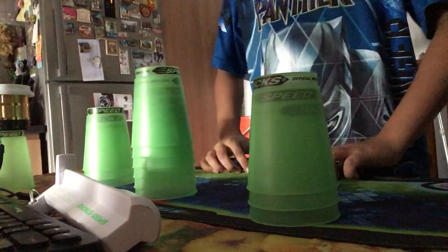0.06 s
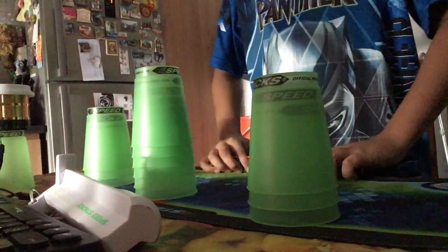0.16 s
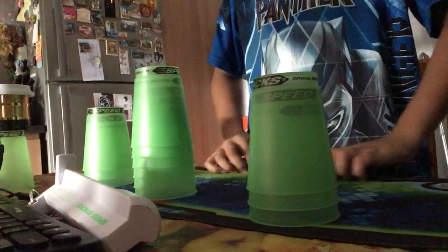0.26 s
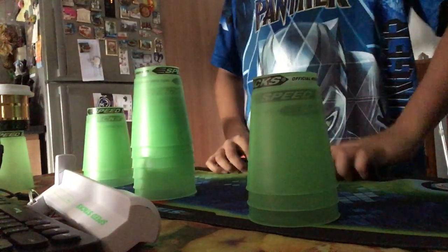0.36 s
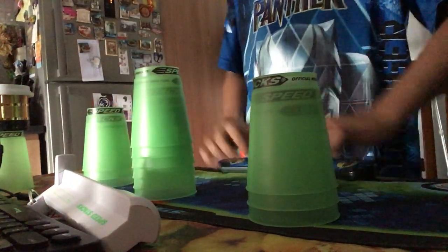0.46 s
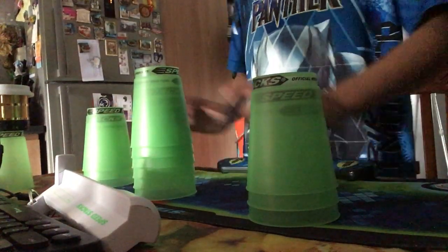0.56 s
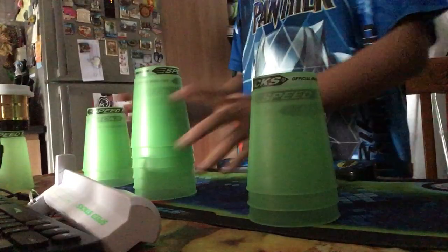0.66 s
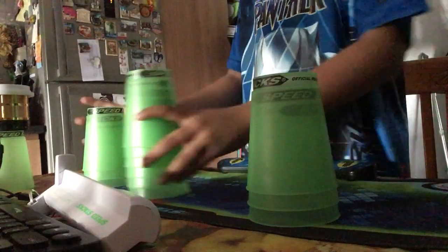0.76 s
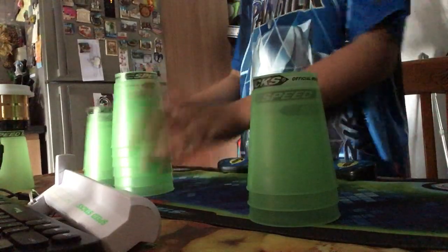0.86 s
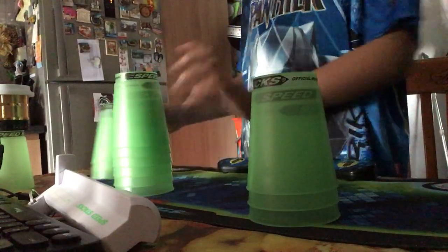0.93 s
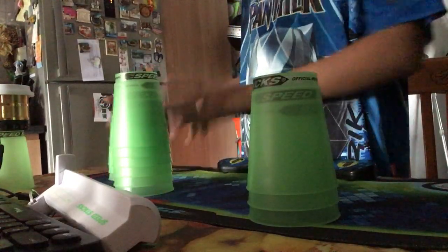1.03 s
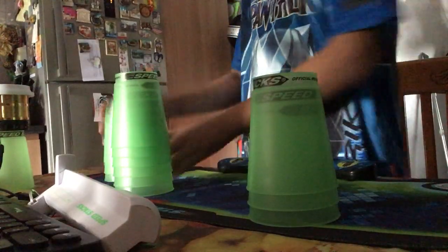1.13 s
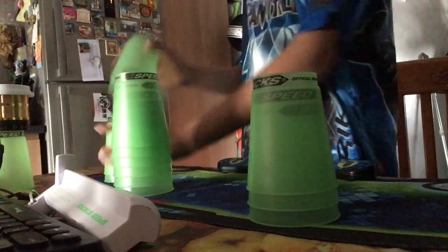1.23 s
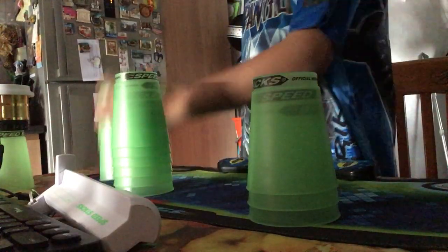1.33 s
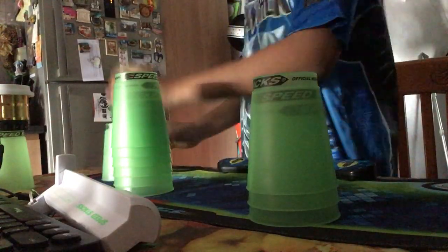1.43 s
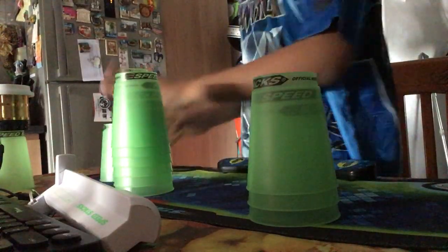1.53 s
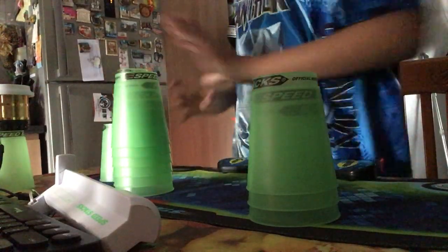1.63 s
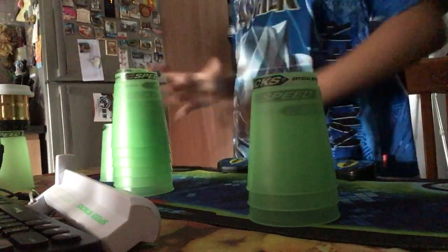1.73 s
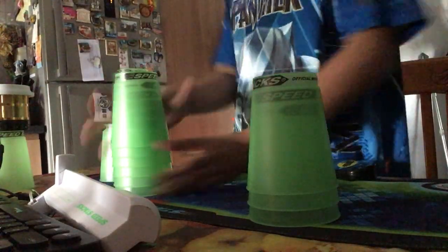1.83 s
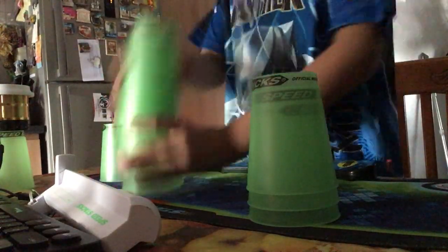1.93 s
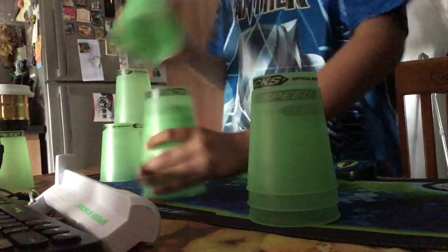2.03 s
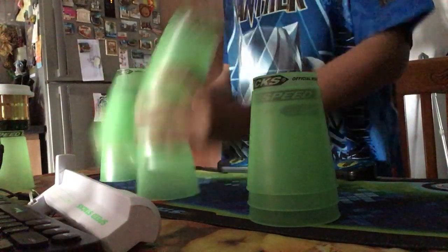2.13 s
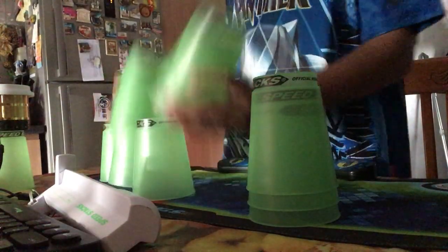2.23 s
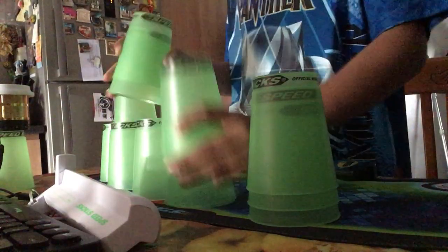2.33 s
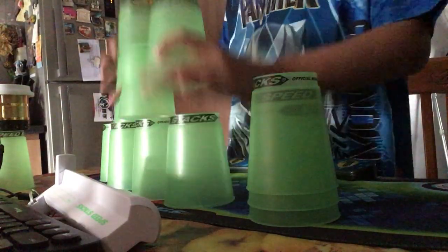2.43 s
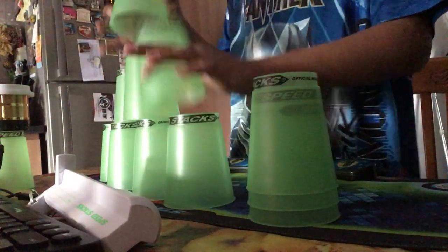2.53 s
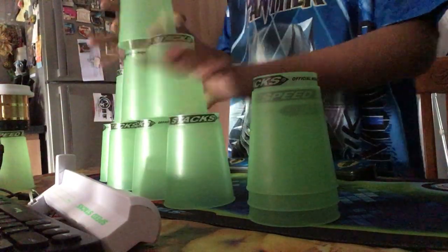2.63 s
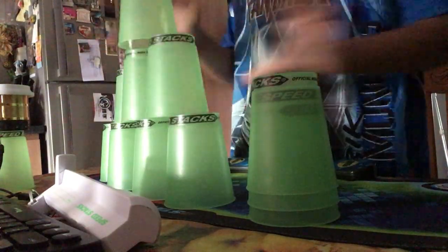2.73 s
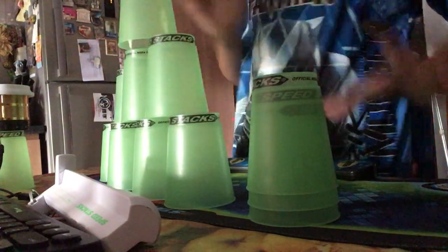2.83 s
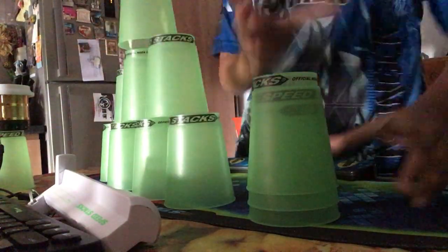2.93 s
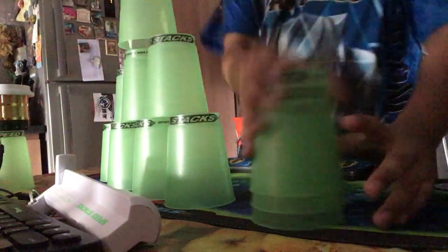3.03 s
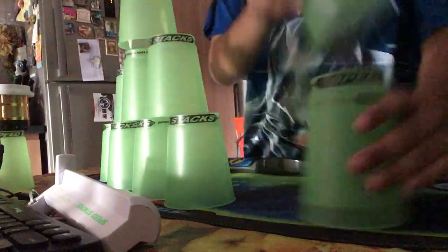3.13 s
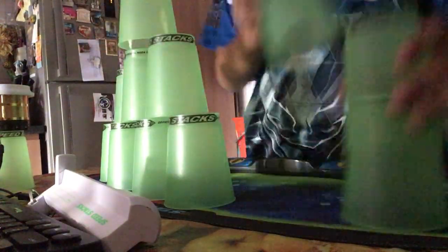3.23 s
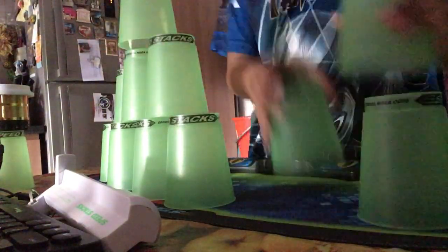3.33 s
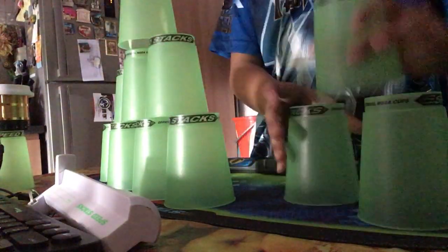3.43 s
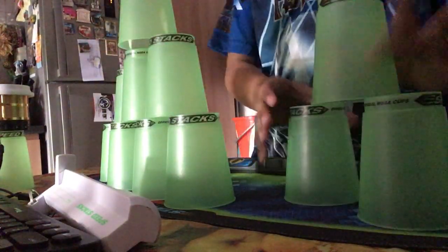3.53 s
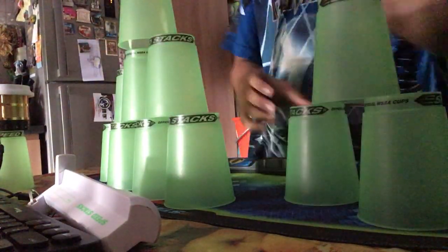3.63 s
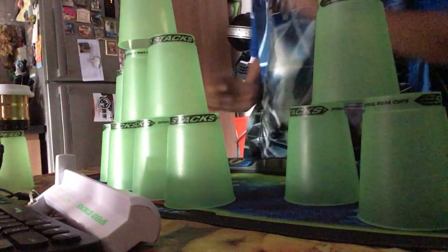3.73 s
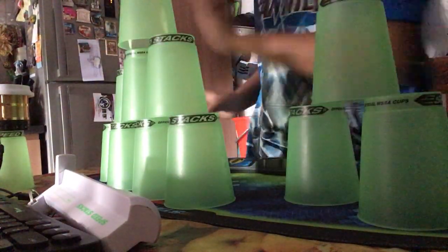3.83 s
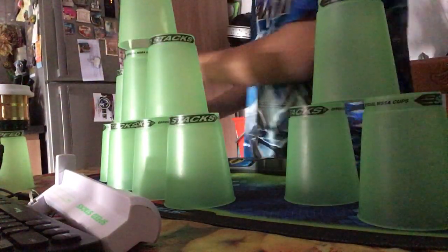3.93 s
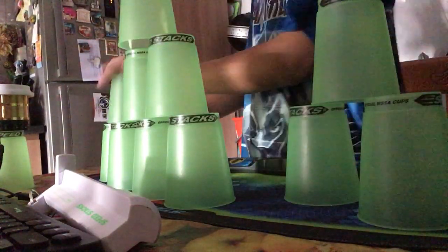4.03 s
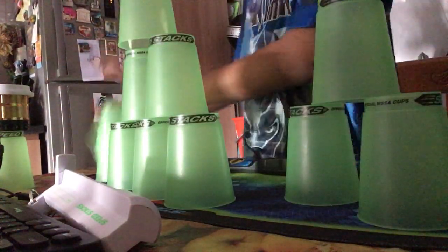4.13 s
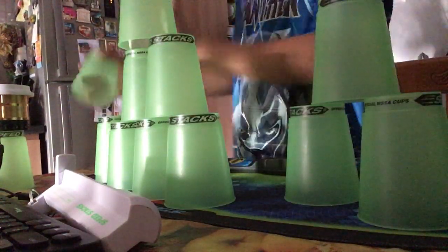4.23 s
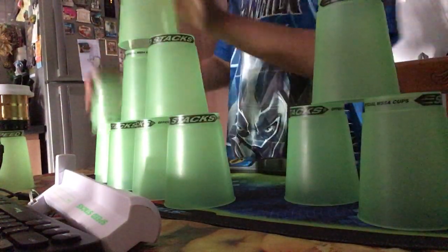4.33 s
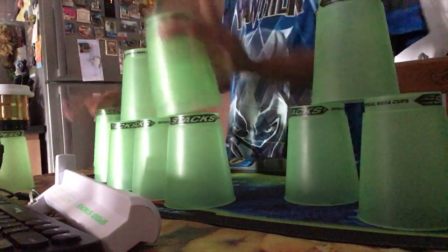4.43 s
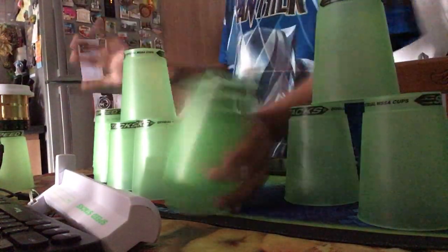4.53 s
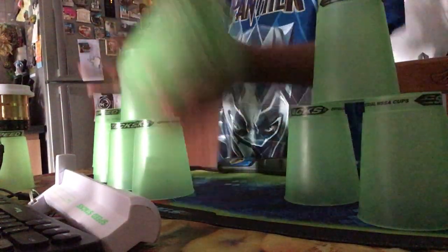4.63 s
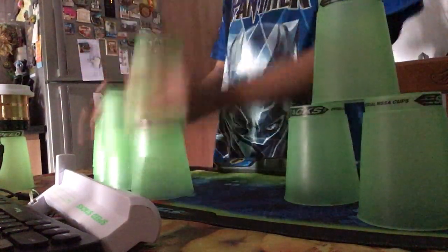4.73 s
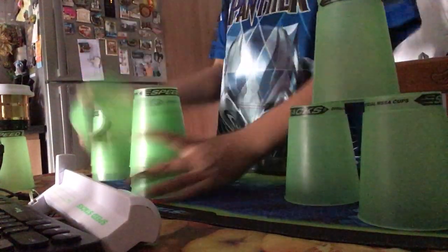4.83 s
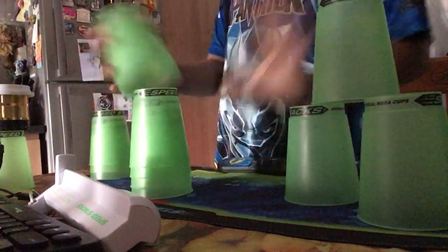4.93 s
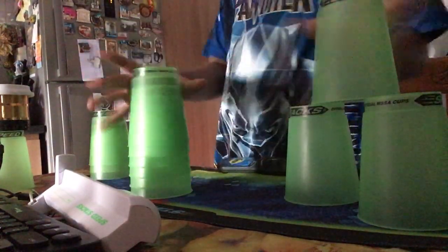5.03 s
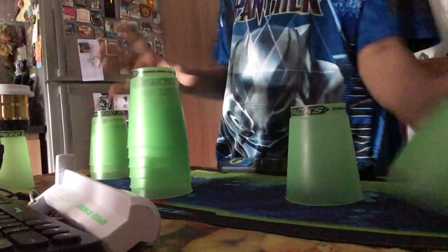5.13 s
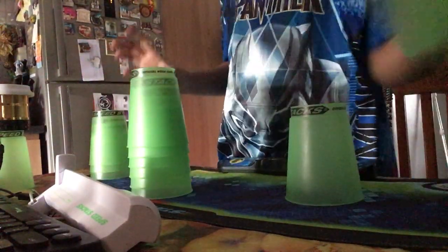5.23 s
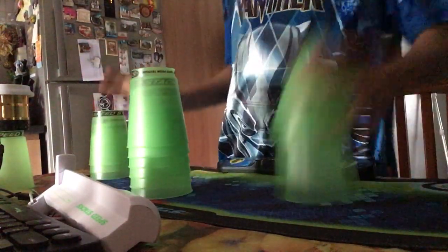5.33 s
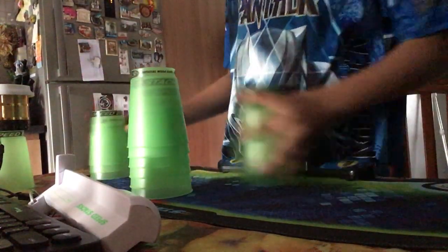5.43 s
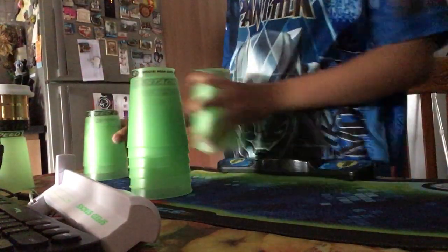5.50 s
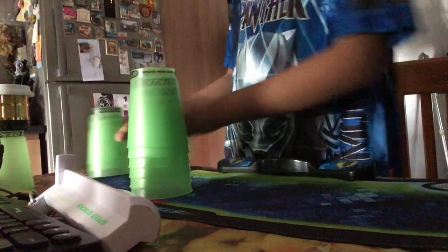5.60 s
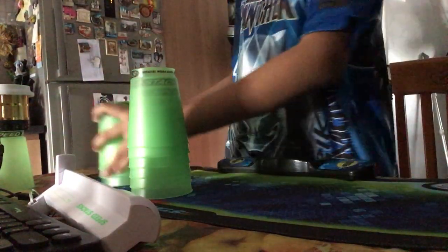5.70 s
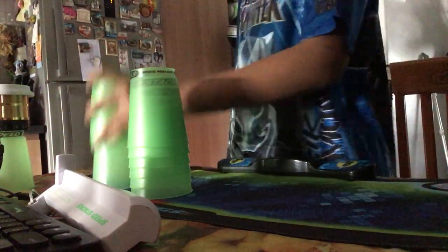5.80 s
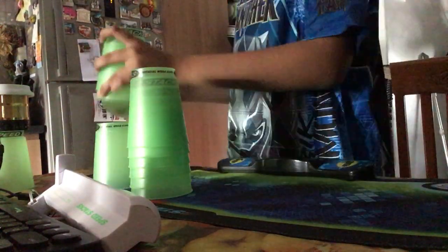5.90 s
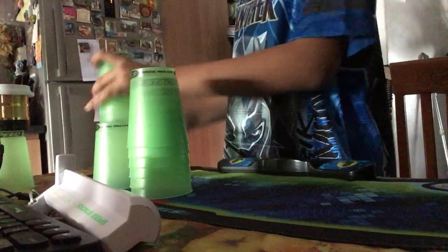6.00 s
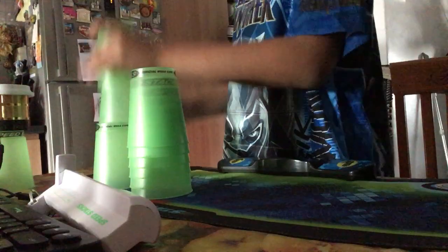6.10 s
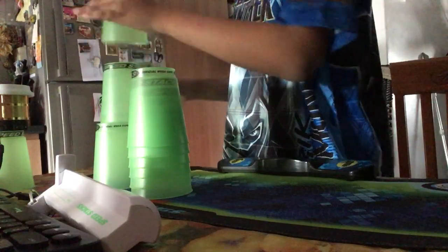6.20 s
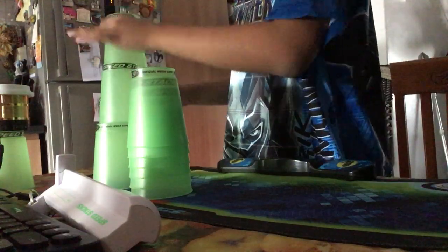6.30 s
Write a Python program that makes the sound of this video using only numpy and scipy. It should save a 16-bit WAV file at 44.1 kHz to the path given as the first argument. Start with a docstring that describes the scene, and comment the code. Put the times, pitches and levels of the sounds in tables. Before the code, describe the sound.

Close to a small microphone in a lightly reverberant room, thin plastic cups are stacked on a mat over a wooden table. Faint taps come first, then hollow pops and dull thumps as a stack is built. A short lull follows, then cups nest together in loud crackling clatters with brief scraping rattles, and a few softer knocks finish. Low rumble and thin hiss lie underneath.

```python
"""Fast stacking of light plastic cups

Light plastic cups are stacked and unstacked on a cloth mat over a wooden table, close to a small microphone.
Each knock is a noise crack of the rims, which drives the wall modes, and a ringing of the air in the cup.
Tiny random slips make sliding cups hiss and rattle; landings and bumps thump the modes of the table.
Rumble, a high hiss, a fuzzy hum and a thin whine lie underneath; sparse echoes give a short room tail."""
import sys
import numpy as np
from scipy import signal
from scipy.fft import rfft, irfft
from scipy.io import wavfile
from scipy.ndimage import uniform_filter1d

SR = 44100
rng = np.random.default_rng(int(sys.argv[2]) if len(sys.argv) > 2 else 0)


def to_wav(sig):
    """Store sig (one row per channel, or 1-D mono) as 16-bit WAV at the path in sys.argv[1].

    Samples outside -1..1 are clipped; the rate is SR.
    """
    pcm = np.clip(np.atleast_2d(sig), -1, 1) * 32767
    pcm = np.round(pcm).astype(np.int16)
    wavfile.write(sys.argv[1], SR, pcm.T)  # frames by channels


def invert_db(level):
    """Linear amplitude ratio for a level in decibels (20 dB per decade), elementwise."""
    return 10 ** (np.asarray(level, dtype=float) / 20)


N = 280476


def evened(x):
    """Normalisation: scales a signal to rms 1."""
    return x / np.sqrt(np.mean(x ** 2) + 1e-20)


def read(points, hz):
    """Interpolation of a table along a logarithmic frequency axis."""
    f, value = np.transpose(points)
    return np.interp(np.log(hz + 1), np.log(f + 1), value)


def coloured(x, spectrum):
    """Spectral shaping: weights each frequency of x by a table in dB, then sets rms 1."""
    gain = invert_db(read(spectrum, np.fft.rfftfreq(len(x), 1 / SR)))
    return evened(irfft(rfft(x) * gain, len(x)))


def ring(modes, sizes, detune, seconds):
    """Modal superposition: a sum of exponentially dying sines, each with its own weight and detuning."""
    t = np.arange(round(seconds * SR)) / SR
    return sum(size * invert_db(db - 60 * t / t60) * np.sin(2 * np.pi * hz * d * t)
               for (hz, db, t60), size, d in zip(modes, sizes, detune))


def loudness(x, db):
    """Level calibration: sets the rms of the first 20 ms."""
    return x * invert_db(db) / np.sqrt(np.mean(x[:882] ** 2))


# Knocks of cup on cup. Each row: start in seconds, cup air level in dB, favoured cup air pitch in Hz,
# rim crack level in dB, favoured wall pitch in Hz.
CUP_KNOCKS = [(0.0342, -57.5, 960, -54.5, 2740), (.0632, -46, 1000, -43.5, 2920),
              (0.0729, -51, 683, -50.5, 1840), (0.269, -57, 600, -61, 1960), (0.302, -67, 1130, -77, 3110),
              (0.3404, -61, 900, -60, 4060), (0.3748, -53.5, 1290, -62, 3050), (.408, -71, 549, -72, 2210),
              (0.8255, -53.5, 470, -64, 1830), (1.1365, -53.5, 680, -65.5, 1840),
              (1.171, -48, 593, -63, 1950), (1.262, -44, 1500, -53, 2370), (1.3988, -63, 573, -66, 1640),
              (1.5009, -27.5, 614, -49.5, 2420), (1.5504, -19.5, 1240, -33.5, 2320),
              (1.564, -26.5, 563, -37, 2170), (1.9494, -54.5, 670, -66, 1730),
              (2.0398, -49, 850, -44.5, 5250), (2.0683, -55, 770, -51, 1850), (2.091, -62, 456, -53, 1640),
              (2.1029, -42.5, 876, -46.5, 4130), (2.1274, -43, 766, -49, 3880),
              (2.1399, -51, 1500, -45.5, 1750), (2.1568, -48.5, 460, -58, 1700),
              (2.2671, -28, 697, -47.5, 1750), (2.3474, -45, 486, -47, 4100),
              (2.404, -50, 870, -52.5, 3020), (2.4229, -26, 434, -50, 1500),
              (2.4325, -50, 610, -46.5, 1590), (2.5152, -24.5, 800, -39.5, 1500),
              (2.594, -41.5, 850, -59, 1720), (2.6653, -22, 570, -40.5, 1470),
              (2.711, -28.5, 875, -38.5, 1500), (2.7265, -22.5, 1290, -32.5, 5700),
              (2.7354, -23, 640, -38, 1470), (3.108, -43, 930, -56.5, 2020), (3.1306, -54, 980, -63, 1500),
              (3.1768, -95, 452, -53, 2730), (3.264, -58, 470, -58, 2950), (3.284, -68, 673, -68, 3100),
              (3.3056, -52.5, 656, -53, 3120), (3.365, -71, 700, -68, 6500), (3.383, -72, 700, -74, 6500),
              (3.3952, -62, 460, -75, 3500), (3.406, -57, 680, -74, 6450), (3.4779, -49, 460, -61.5, 2730),
              (3.5582, -21, 1196, -34.5, 5540), (3.5714, -27, 717, -56, 2960),
              (4.0904, -29.5, 1084, -49, 1780), (4.1865, -48.5, 660, -58, 3460),
              (4.2143, -42.5, 1460, -44.5, 3180), (4.2744, -38, 780, -34, 1927),
              (4.2875, -60, 738, -39.5, 2270), (4.4526, -41, 1010, -52.5, 5560),
              (4.479, -33, 745, -48.5, 2310), (4.4978, -35, 1070, -31.5, 5670),
              (4.509, -29.5, 1050, -45, 1520), (4.5528, -21.5, 712, -22.5, 2040),
              (4.5802, -37, 590, -50, 3610), (4.6152, -21.5, 914, -26.5, 1930),
              (4.806, -54, 630, -51, 2470), (4.821, -43, 433, -39.5, 2580), (4.8338, -18, 650, -32, 6100),
              (4.851, -37, 600, -38, 3100), (4.88, -36, 710, -34, 2420), (4.8862, -21.5, 487, -29, 1910),
              (5.104, -53, 620, -54.5, 6000), (5.1198, -43, 1240, -44.5, 2700),
              (5.1396, -24.5, 1355, -25.5, 1860), (5.1446, -43, 1550, -36, 1520),
              (5.166, -36, 666, -57, 1520), (5.1909, -40, 594, -36, 3450), (5.2054, -31, 880, -28, 3120),
              (5.222, -24.5, 875, -20.5, 6500), (5.2254, -22, 1040, -38, 1730),
              (5.4229, -15, 600, -26, 2850), (5.4383, -27.5, 1250, -40.5, 2720),
              (5.4493, -24, 635, -28.5, 1500), (5.4738, -20.5, 790, -19.5, 4130),
              (5.489, -46, 710, -37.5, 2030), (5.7433, -31.5, 460, -39.5, 1680),
              (5.762, -38.5, 795, -36.5, 2000), (5.776, -43, 506, -53.5, 2150),
              (5.9572, -64, 711, -63.5, 2820), (6.0652, -56, 1120, -75, 1548),
              (6.102, -23, 512, -35.5, 1760), (6.1352, -25.5, 594, -43.5, 1920),
              (6.2105, -46, 950, -55, 1700), (6.2893, -48, 650, -69, 1620), (6.324, -49, 1010, -77, 1500),
              (6.3497, -28.5, 1120, -43.5, 2330)]


def knocks():
    """Impact excitation: every contact cracks the rims, clacks the wall and rings the enclosed air."""
    out = np.zeros(N + SR)
    chance = rng.standard_normal((len(CUP_KNOCKS), 2, 13))
    noises = rng.standard_normal((len(CUP_KNOCKS), 2048))
    for (s, air_db, air_hz, rim_db, wall_hz), (size, tune), noise in zip(CUP_KNOCKS, chance, noises):
        dull_db = max(air_db - rim_db, 0)
        parts = (wall_clack(noise, wall_hz, rim_db, dull_db, size, tune),
                 loudness(cup_air(air_hz, size, tune), air_db),
                 loudness(rim_crack(noise, dull_db, size, tune), rim_db))
        at = round(s * SR)
        for part in parts:
            out[at:at + len(part)] += part
    return out[:N]


# Colour of the rim crack. Each row: frequency in Hz, relative level in dB.
RIM_COLOUR = [(1500, 8), (3500, 10), (6000, 9), (9000, 3.5), (13000, 0.5), (16000, -13)]


def rim_crack(noise, dull_db, size, tune):
    """Contact noise: rubbing rims give a broadband burst, duller where the cup air outweighs the rims."""
    t = np.arange(len(noise)) / SR
    hz = np.geomspace(1500, 16000, 26)
    bright_db = 4 * np.maximum(np.log2(hz / 6000), 0)  # dB per octave
    dulling_db = 0.09 * dull_db * np.maximum(np.log2(hz / 5900), 0)
    bumps_db = 3 * np.append(size, tune)  # every pair of rims has its own uneven colour
    colour = np.c_[hz, read(RIM_COLOUR, hz) + bright_db - dulling_db + bumps_db]
    rise = 1 - np.exp(-(t / 0.0011) ** 2)
    decay = np.exp(-t / 0.0017) + 0.18 * np.exp(-t / 0.022)
    return coloured(noise, colour) * rise * decay


# Modes of the cup wall. Each row: frequency in Hz, relative level in dB, t60 in seconds when gripped.
WALL_MODES = [(1474, 11, 0.01), (1750, 8.5, 0.0082), (1970, 4.5, 0.012), (2164, -1.5, 0.015),
              (2415, 10, 0.0082), (2700, 5, 0.013), (3110, 2, 0.02), (3500, 5.5, 0.0074), (4060, -1, 0.016),
              (4400, -6, 0.007), (4850, -4, 0.007), (5700, 3, 0.015), (6500, -6, 0.012)]


def wall_clack(noise, wall_hz, rim_db, dull_db, size, tune):
    """Forced modal vibration: the rims chatter for a few ms and that burst drives the cup wall."""
    t = np.arange(len(noise)) / SR
    burst = 0.4 * noise * (1 - np.exp(-t / 0.001)) * np.exp(-t / 0.0015)
    click = np.exp(-((t - 0.001) / 0.00005) ** 2)
    # fingers damp most of the wall; the free part rings on
    grip_db = -18 * np.minimum(abs(np.log2(np.transpose(WALL_MODES)[0] / wall_hz)), 0.8)
    modes = [(hz, db, t60 * (1.4 if grip > -2 else 1)) for (hz, db, t60), grip in zip(WALL_MODES, grip_db)]
    body = ring(modes, invert_db(grip_db) * np.sign(size), 1 + 0.006 * tune, 0.12)
    wall = signal.fftconvolve(body, burst + click)
    # the wall leads the rims more in a dull knock, and in a tap whose rims are below -53.5 dB
    peak_db = rim_db + 15.5 + 0.1529 * dull_db + 0.42 * max(-53.5 - rim_db, 0)
    return wall / abs(wall).max() * invert_db(peak_db)


# Modes of the cup body and its air. Each row: frequency in Hz, relative level in dB, basic t60 in seconds.
CUP_AIR_MODES = [(460, 13.5, 0.011), (548, -3.5, 0.042), (623, 8.5, 0.025), (724, 6, 0.027),
                 (800, -2, 0.042), (882, 11, 0.014), (1055, 3, 0.018), (1120, 3.5, 0.02),
                 (1240, -2.5, 0.023), (1346, -13, 0.03), (1500, -11, 0.032)]


def cup_air(air_hz, size, tune):
    """Cavity resonance: the air in the cup rings near a favoured pitch, building up over the contact."""
    hz, db, t60 = np.transpose(CUP_AIR_MODES)
    octaves = np.log2(hz / air_hz)
    fit = np.cos(np.pi * octaves) ** 2  # 1 at the favoured pitch and its octaves
    nesting_db = -4 * abs(octaves) + 0.69 * octaves - 9 * (1 - fit)
    upper = (hz > 1000) * (hz < 1.5 * air_hz)
    longer = 1 + 1.3 * fit ** 10 * (hz / 1100) ** 2 * upper  # the favoured upper modes ring on
    air = -ring(zip(hz, db + nesting_db, t60 * longer), invert_db(2 * size), 1 + 0.005 * tune, 0.2)
    t = np.arange(len(air)) / SR
    return air * (1 - np.exp(-(t / 0.0019) ** 2))


# Colour of the sliding hiss. Each row: frequency in Hz, relative level in dB.
SLIP_COLOUR = [(1500, -13), (3500, -10), (6000, 2), (9000, -2.5), (13000, -2.5), (16000, -14.5)]
# Strokes of cups sliding over each other or the mat. Each row: fastest moment in seconds,
# length in seconds, hiss level in dB, rattle level in dB, rattle pitch in Hz.
SLIDE_STROKES = [(0.302, 0.24, -75, -50, 1380), (1.298, 0.11, -50, -57, 5700),
                 (1.968, 0.43, -59.5, -58.5, 3970), (2.071, 0.075, -45, -49, 910),
                 (2.204, 0.36, -53.5, -56, 3120), (2.484, 0.15, -48, -60, 4000),
                 (2.57, 0.14, -51, -39.5, 900), (2.714, 0.03, -39, -22, 1130),
                 (3.12, 0.11, -57.5, -52, 1020), (3.187, 0.13, -42.5, -55, 2700),
                 (3.264, 0.032, -60, -53, 3040), (3.315, 0.024, -55, -52.5, 3070),
                 (3.384, 0.082, -53, -84, 6500), (4.16, 0.41, -54, -47.5, 1050),
                 (4.204, 0.11, -41.5, -52, 3050), (4.281, 0.2, -41.5, -40.5, 4140),
                 (4.48, 0.15, -39, -37.5, 1110), (4.516, 0.084, -33, -30, 1090),
                 (4.6, 0.13, -46, -49, 3500), (4.8, 0.044, -54, -40.5, 681),
                 (4.872, .09, -34.5, -31.5, 3500), (5.17, 0.042, -48, -29, 800),
                 (5.195, 0.029, -23.5, -28, 3200), (5.345, 0.024, -42, -62, 1000),
                 (5.445, .046, -24, -21.5, 1200), (5.793, 0.31, -56, -51.5, 2430),
                 (5.914, 0.23, -60, -65, 6000), (6.149, 0.25, -46.5, -37.5, 920)]


def slides():
    """Stick-slip friction: uneven tiny slips make a grainy hiss and rattle the cup modes near one pitch."""
    happens = rng.random(N) < 5000 / SR  # 5000 slips per second on average
    slips = invert_db(3 * np.minimum(rng.exponential(1, N), 4)) * rng.standard_normal(N) * happens
    slips *= invert_db(2.7 * evened(uniform_filter1d(rng.standard_normal(N), 220)))  # uneven over about 5 ms
    hiss = coloured(slips, SLIP_COLOUR)
    modes = WALL_MODES + CUP_AIR_MODES
    out = np.zeros(N + SR)
    for s, length, hiss_db, rattle_db, rattle_hz in SLIDE_STROKES:
        rise = 0.3 * length  # time spent speeding up
        at = round((s - rise) * SR)
        t = np.arange(0, length, 1 / SR)
        stroke = np.interp(t, [0, rise, length], [0, 1, 0]) ** 1.9
        near = invert_db(-10 * abs(np.log2(np.transpose(modes)[0] / rattle_hz)))
        body = ring(modes, near, np.ones(len(modes)), 0.06)
        drive = stroke * evened(slips[at:at + len(t)])
        rattle = signal.fftconvolve(drive, body / np.linalg.norm(body))
        out[at:at + len(t)] += invert_db(hiss_db) * stroke * hiss[at:at + len(t)]
        out[at:at + len(rattle)] += invert_db(rattle_db) * rattle
    return out[:N]


def hardness(s, peak_db):
    """Contact stiffness: tilt in dB per octave, hard if a comparably strong knock falls within 8 ms, else soft."""
    soft_db, hard_db = -6.5, 3.5  # a bare hand, a cup
    when, air_db = np.transpose(CUP_KNOCKS)[:2]
    lead_db = np.max(air_db - 200 * (abs(when - s) > 0.008)) - peak_db
    return soft_db + (hard_db - soft_db) / (1 + np.exp(-np.clip((lead_db + 25.5) / 5, -30, 30)))


# Modes of the table top. Each row: frequency in Hz, relative level in dB, t60 in seconds.
TABLE_MODES = [(78, -45, 0.048), (92, -9.5, 0.31), (124.4, 3.5, 0.18), (145.4, 0.5, 0.11),
               (177.3, -1.5, 0.19), (193.2, -10, 0.36), (227, -27.5, 0.12), (267.5, -7, 0.2),
               (305, 3.5, 0.068), (334.7, -2.5, 0.13), (395.7, -4, 0.083), (470, -9.5, 0.053)]
# Cups landing on the mat or a hand bumping the table. Each row: time in seconds, thump peak in dB.
TABLE_THUMPS = [(0.073, -26), (0.527, -36.5), (0.823, -28), (1.167, -22.5), (1.5, -14.5), (1.549, -16.5),
                (1.955, -26), (1.988, -31.5), (2.092, -19.5), (2.129, -23.5), (2.266, -12), (2.421, -11),
                (2.512, -24), (2.666, -21), (2.708, -19.5), (2.734, -22.5), (3.099, -25.5), (3.131, -34),
                (3.156, -25), (3.263, -30.5), (3.304, -34), (3.477, -19), (3.555, -24.5), (4.092, -22.5),
                (4.183, -27.5), (4.212, -29.5), (4.273, -23.5), (4.475, -16.5), (4.551, -15), (4.58, -20),
                (4.614, -5.5), (4.833, -8.5), (4.886, -2), (5.138, -21), (5.193, -18.5), (5.221, -14.5),
                (5.423, -6), (5.452, -19), (5.471, -10.5), (5.49, -6), (5.739, -15.5), (5.774, -22),
                (6.102, -22.5), (6.135, -15.5), (6.346, -22.5)]


def thumps():
    """Plate modes: a push through the mat rings the table top; harder landings reach its higher modes."""
    out = np.zeros(N + SR)
    chance = rng.standard_normal((len(TABLE_THUMPS), 2, 12))
    for (s, peak_db), (size, tune) in zip(TABLE_THUMPS, chance):
        reach_db = hardness(s, peak_db) * np.log2(np.transpose(TABLE_MODES)[0] / 180) + 2 * size
        thump = -ring(TABLE_MODES, invert_db(reach_db), 1 + 0.015 * tune, 0.4)
        t = np.arange(len(thump)) / SR
        thump *= 1 - np.exp(-(t / 0.0029) ** 2)  # the board takes a few ms to answer
        at = round((s + 0.00096) * SR)
        out[at:at + len(thump)] += thump / abs(thump).max() * invert_db(peak_db)
    return out[:N]


# Decay of the room. Each row: frequency in Hz, t60 in seconds.
ROOM_DECAY = [(100, 0.35), (400, 0.47), (1000, 0.3), (3000, 0.38), (7000, 0.39), (14000, 0.4)]


def room(x):
    """Reverberation: three tails of sparse random taps, blended in a steady rotation; each band has its own t60."""
    taps = np.zeros((3, SR // 2))
    slots = np.arange(260, SR // 2 - 10, 10)  # one tap in every 10 samples, from 6 ms on
    shape = (3, len(slots))
    np.put_along_axis(taps, slots + rng.integers(0, 10, shape), rng.choice([-1., 1.], shape), 1)
    hz, t, z = signal.stft(taps, SR, nperseg=256)
    decay = invert_db(-60 * t / read(ROOM_DECAY, hz)[:, None])
    tails = signal.istft(z * decay, SR, nperseg=256)[1]
    phase = 1.7 * np.arange(N) / SR + np.arange(3)[:, None] / 3  # 1.7 turns per second
    turns = np.sqrt(2 / 3) * np.cos(2 * np.pi * phase)
    return signal.fftconvolve(x * turns, tails / np.linalg.norm(tails[0]), axes=1).sum(0)[:N]


# Colour of the low rumble. Each row: frequency in Hz, relative density in dB per Hz.
RUMBLE_COLOUR = [(12, -35.5), (20, -3), (70, 11), (130, 7), (204, 6.5), (388, -7), (459, -8.5),
                 (1150, -19.5), (1330, -22.5), (1610, -22.5), (6540, -29), (10200, -40), (11100, -38),
                 (12800, -44), (16000, -58)]


def rumble():
    """Amplitude-modulated noise: low coloured noise that swells slowly and irregularly."""
    swell = invert_db(0.5 * evened(uniform_filter1d(rng.standard_normal(N), 5000)))
    return invert_db(-47.5) * swell * coloured(rng.standard_normal(N), RUMBLE_COLOUR)


# Colour of the full hiss. Each row: frequency in Hz, relative density in dB per Hz.
FULL_HISS = [(2940, -54), (5000, -25), (5840, -2), (7420, -10), (8330, 9), (9370, 6.5), (13400, 3.5),
             (14900, -5), (16000, -21)]
# The same hiss while it creeps back, treble last. Each row: frequency in Hz, relative density in dB per Hz.
DULL_HISS = [(2350, -51), (4000, -24), (5250, -50), (6980, 11.5), (10400, -4.5), (10700, 1), (13100, -25),
             (16000, -25.5)]
# The coming and going of the hiss. Each row: time in seconds, level in dB.
HISS_COURSE = [(0, -60.5), (1.2, -58.5), (2.0, -58.5), (2.3, -68), (2.75, -74), (2.9, -77), (3.6, -73),
               (3.72, -70), (3.85, -60.5), (4.1, -59.5), (4.5, -56.5), (5.1, -62.5), (5.7, -64), (6.0, -74),
               (6.36, -71.5)]


def high_hiss():
    """Filtered noise with a lagging colour: it comes and goes, and stays dull after it has been faint."""
    hiss_db = np.interp(np.arange(N) / SR, *np.transpose(HISS_COURSE))
    keep = np.exp(-1 / (0.12 * SR))  # the colour lags by 0.12 s
    faint_db = signal.lfilter([1 - keep], [1, -keep], np.maximum(-66 - hiss_db, 0))  # faint: below -66 dB
    dull = np.clip(0.15 + faint_db / 8, 0, 1)
    noise = rng.standard_normal(N)
    return invert_db(hiss_db) * ((1 - dull) * coloured(noise, FULL_HISS) + dull * coloured(noise, DULL_HISS))


def held(t, db, hold_s, fade_db_per_s):
    """Exponential decay after a plateau: a level that holds and then fades steadily in dB."""
    return invert_db(db - fade_db_per_s * np.maximum(t - hold_s, 0))


def hum():
    """Narrow-band noise: a fuzzy tone near 300 Hz that holds and then fades."""
    level = held(np.arange(N) / SR, -55.5, hold_s=1.05, fade_db_per_s=14)
    # each row: frequency in Hz, relative level in dB
    return level * coloured(rng.standard_normal(N), [(270, -42), (297, 11), (311, 10), (340, -63)])


def whine():
    """Randomly modulated sine: a thin whine enters at 2.99 s, wavers in level, holds and then fades."""
    t = np.arange(N) / SR
    since = t - 2.99
    level = held(since, -69.5, hold_s=1.2, fade_db_per_s=16) * np.clip(since / 0.03, 0, 1)
    smooth = uniform_filter1d(uniform_filter1d(rng.standard_normal(N), 150), 150)
    waver = 1 + 0.3 * evened(smooth)  # fuzz around the line
    return level * waver * np.sin(2 * np.pi * 10850 * t)


def background():
    """Superposition of independent sources: rumble, high hiss, hum and whine."""
    return rumble() + high_hiss() + hum() + whine()


def scene():
    """Direct and reverberant sound: cups and table close by, their room tail, and the background."""
    cups = knocks() + slides()
    table = thumps()
    tail = room(invert_db(-12) * cups + invert_db(-10) * table)
    return (cups + table + tail + background())[None]


def low_pass(x):
    """Removes everything above the highest recorded frequency."""
    return signal.sosfilt(signal.butter(12, 16640, fs=SR, output="sos"), x)


def record(dry):
    """Saturation and high-pass filtering: the small microphone squeezes loud peaks and drops the deep bass."""
    squeezed = 0.75 * np.tanh(dry / 0.75)
    thin = signal.sosfilt(signal.butter(3, 60, "high", fs=SR, output="sos"), squeezed)
    return low_pass(thin)


dry = scene()
out = record(dry)
to_wav(out)
```